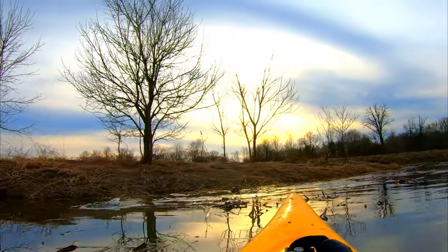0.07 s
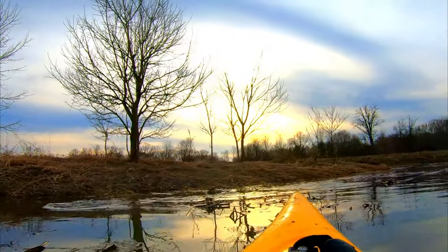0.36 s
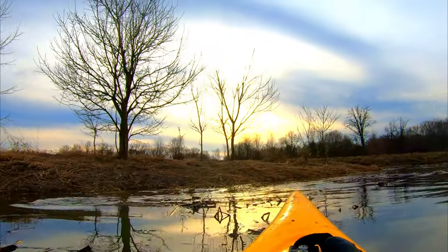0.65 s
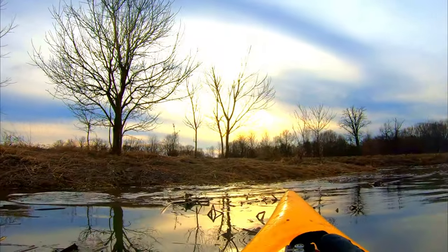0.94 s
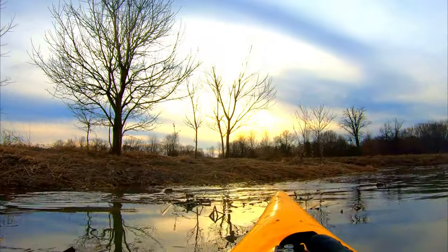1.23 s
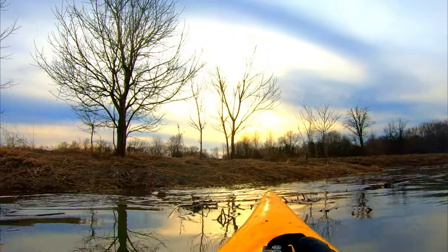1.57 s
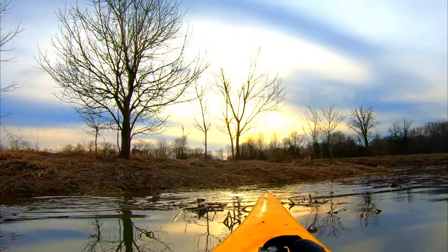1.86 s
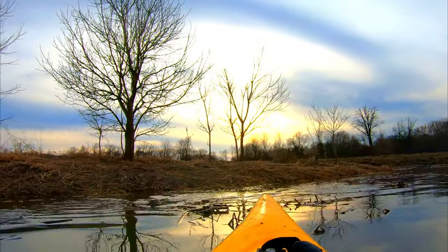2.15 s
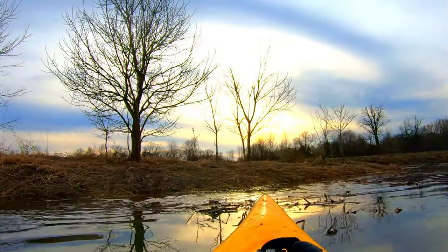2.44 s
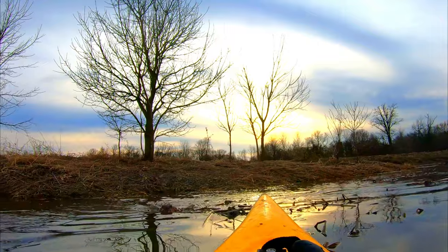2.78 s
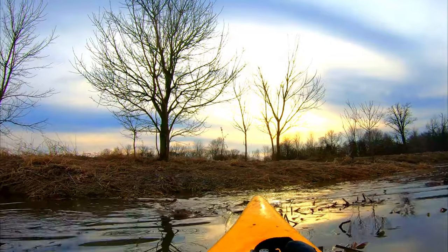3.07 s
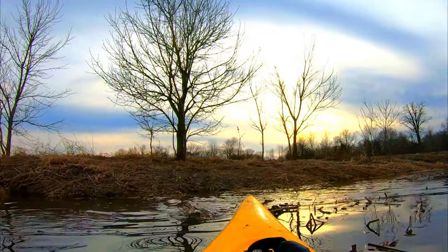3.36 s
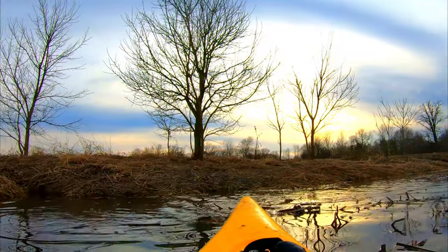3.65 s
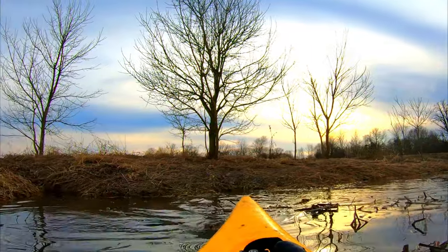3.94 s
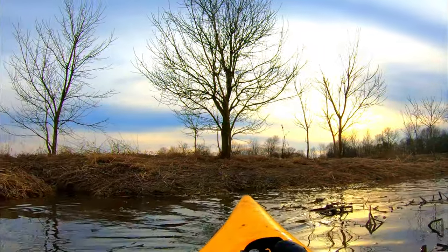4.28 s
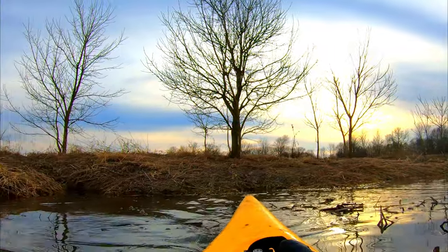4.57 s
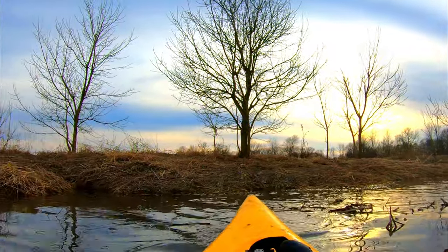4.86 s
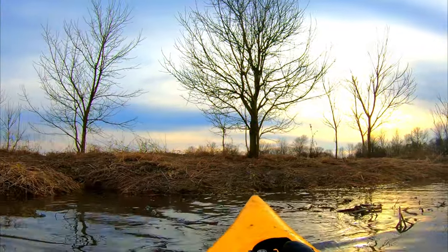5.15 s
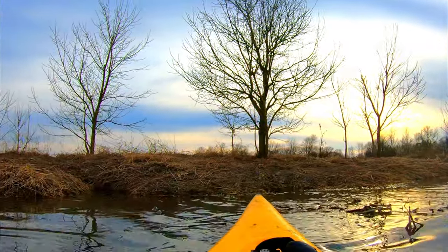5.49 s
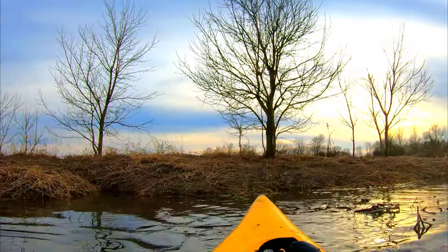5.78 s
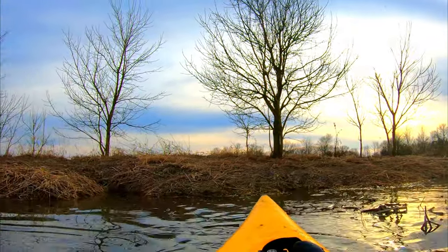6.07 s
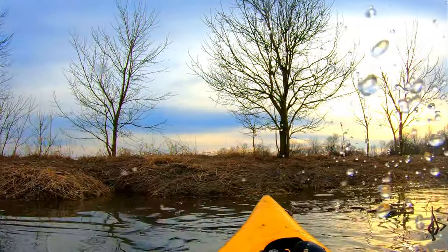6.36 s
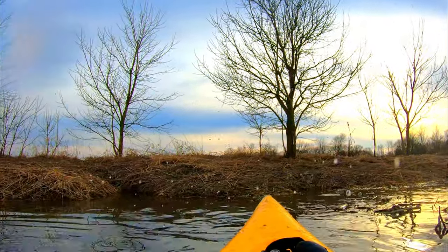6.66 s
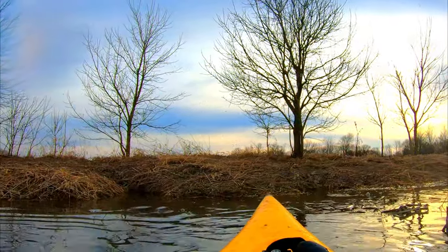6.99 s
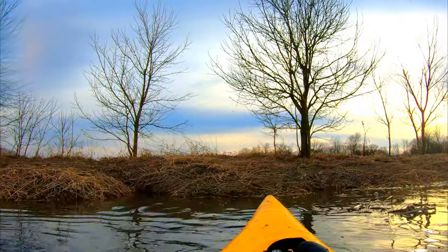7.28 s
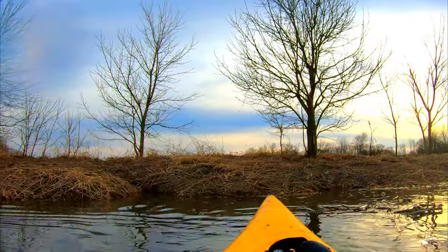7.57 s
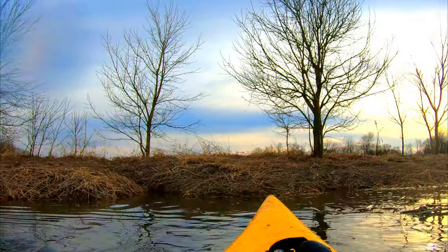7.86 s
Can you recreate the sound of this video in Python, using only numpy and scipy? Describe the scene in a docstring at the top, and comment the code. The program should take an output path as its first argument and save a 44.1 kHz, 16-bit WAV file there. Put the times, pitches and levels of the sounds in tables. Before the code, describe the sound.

On a calm river in open country, a microphone on a kayak picks up small waves lapping and bubbles plopping along the hull. A distant engine hums faintly and fades as the water quietens. A blackbird sings a few notes and a fast trill. Near the end, a loud splash bursts up on the right, drops crack against the microphone, and the spray patters away.

```python
"""On a river, close to the bank, a kayak drifts along. Water trickles and laps at the bow: each little
note is a trapped air bubble ringing. About six seconds in, a splash on the right throws water over the
camera, whose microphone openings crack and ring; drops patter back and the river calms.
Behind the water a blackbird whistles and trills, a small bird twitters, a far engine hums and a breeze
rumbles. A faint, high hiss comes and goes far off, over the soft wash of open country."""
import sys
import numpy as np
from scipy import signal
from scipy.fft import rfft, irfft
from scipy.io import wavfile
from scipy.ndimage import uniform_filter1d

SR = 44100
rng = np.random.default_rng(int(sys.argv[2]) if len(sys.argv) > 2 else 0)


def store_pcm(level_fs):
    """Save levels as 16-bit WAV."""
    pcm = np.round(np.clip(level_fs, -1, 1) * 32767).astype(np.int16)
    wavfile.write(sys.argv[1], SR, np.atleast_2d(pcm).T)


N = 349713
TIME = np.arange(N) / SR
WHOLE = 0, TIME[-1]
GLIDE_END_S, CALM_S = 1.895, 4.95  # the flow drops to a resting trickle; later even that fades
SURGE_S, PATTER_S = 6.31, 6.404  # the wave peaks; the spray starts to land
ATTACK_S = 0.013  # how fast thrown water starts to sound

# small waves breaking on the bow: (time [s], length [s], level [dB])
WAVELETS = [(-0.006, 0.14, -47.5), (1.12, 0.14, -46), (1.268, 0.14, -44.5), (1.415, 0.11, -51),
            (1.479, 0.2, -48.5), (1.696, 0.19, -51.5), (1.889, 0.055, -47.5), (2.255, 0.17, -61.5),
            (2.804, 0.049, -63), (3.652, 0.052, -47.5), (4.27, 0.6, -66.5), (5.173, 0.091, -55.5),
            (6.734, 0.066, -52.5)]
# how loud gurgling bubbles are at each pitch: (pitch [Hz], level [dB])
GURGLE_PITCHES = [(250, -13.5), (500, 0.5), (900, 2.5), (1600, 0.5), (3000, -1), (5000, -5.5),
                  (8000, -39.5)]
# slow bubbles that swoop up as they surface: (pitch [Hz], level [dB])
BLOOP_PITCHES = [(380, -0.5), (600, -5), (1000, 1), (1800, 2), (3200, -6)]
# pinhead bubbles: (pitch [Hz], level [dB])
TINKLE_PITCHES = [(2200, -13), (4000, 0.5), (6000, 9), (9000, 4)]
# the tone of tiny bursting droplets: (frequency [Hz], level [dB])
FIZZ_TONE = [(300, -4), (1500, 13.5), (3500, -5.5), (6000, -0.5), (9000, -1), (10500, -10.5), (12000, -33),
             (16000, -27.5)]
def trickle():
    """Water along the hull bubbles and fizzes, more with each wavelet; landing spray fizzes too."""
    resting = fade(CALM_S, db_per_s=16.5)
    lapping = sum(amp(db) * swell(s, length) for s, length, db in WAVELETS)
    flow = amp(-55.5) * fade(GLIDE_END_S, db_per_s=90) + amp(-62.5) * resting
    fizzing = amp(-56.5) * fade(GLIDE_END_S, db_per_s=15.5) + amp(-73.5) * resting
    fizzing += amp(-67) * onset(PATTER_S) * fade(PATTER_S, db_per_s=28) + amp(-12) * lapping
    gurgle = flow * swarm(GURGLE_PITCHES, WHOLE, per_s=550, spread_db=2.5, side_db=-1.5, cycles=3.5)
    bloops = swarm(BLOOP_PITCHES, WHOLE, per_s=18, spread_db=-1, side_db=-2.5,
                   cycles=9.6, climb=.14, count=40)
    bloops *= amp(-8) * (flow + amp(1.5) * lapping)
    slosh = swarm(GURGLE_PITCHES, WHOLE, per_s=1800, spread_db=1.2, side_db=2, cycles=7, climb=.02)
    tinkle = swarm(TINKLE_PITCHES, WHOLE, per_s=90, spread_db=2.5, side_db=-8, cycles=9)
    fizz = fizzing * crackle(FIZZ_TONE, per_s=530) * sides(-1.5)
    pulsing = amp(-4.5 + 2 * wander(36))
    return pulsing * (gurgle + fizz) + bloops + lapping * slosh + amp(-10) * fizzing * tinkle


# the loudest single bubbles:
# (time [s], level [dB], pitch [Hz], ring [cycles], upward swoop [0-1], left over right [dB])
BIG_BUBBLES = [(0.03, -29.5, 2280, 2.4, 0, 8), (0.058, -32, 1530, 3.9, 0.07, 6),
               (0.058, -35, 947, 7.2, 0.07, -2), (0.293, -41, 990, 16, 0.02, -16),
               (0.343, -33, 3370, 8.2, 0.04, -6), (0.388, -42, 2630, 9.9, 0.14, -8),
               (0.475, -44.5, 1300, 12, 0.12, -16), (0.523, -39.5, 1660, 2.5, 0.03, -6),
               (0.627, -44.5, 597, 7.1, 0.15, -4), (0.704, -38.5, 1510, 8.8, 0.04, -12),
               (0.739, -42, 1377, 9.1, 0.03, 3), (0.783, -51, 3280, 13, 0.03, 0),
               (0.957, -40, 524, 12, 0.12, -7), (1.166, -37, 1870, 7.3, 0.1, 8),
               (1.193, -24, 3340, 3, 0.01, 5), (1.317, -34.5, 1058, 11, 0.06, 13),
               (1.346, -39.5, 553, 8.3, 0.33, -10), (1.45, -25, 1850, 2.3, 0.06, 8),
               (1.478, -26, 1670, 2.4, 0, 7), (1.531, -37.5, 533, 14, 0.14, -18),
               (1.543, -30, 730, 9.6, .04, 11), (1.599, -29, 1674, 4.4, 0.02, 5),
               (1.673, -34, 1720, 3.5, 0.03, 6), (1.71, -31.5, 1910, 2.7, 0.12, 13),
               (1.743, -28.5, 1570, 2.9, .03, 4), (1.752, -34.5, 1700, 10, 0.1, 5),
               (1.812, -38, 415, 3.9, 0.05, -7), (1.855, -41.5, 2670, 13, 0.22, 6),
               (1.904, -33, 1370, 2.3, 0.01, 8), (1.961, -39.5, 548, 5.3, 0.4, -7),
               (2.015, -49.5, 852, 5.6, 0.09, 4), (2.17, -41, 2730, 11, 0.28, 5),
               (2.192, -49.5, 2700, 13, 0.4, 4), (2.27, -45.5, 1673, 6.4, 0.01, 1),
               (2.299, -45.5, 1306, 8.1, 0.02, 7), (2.818, -43, 1520, 9.7, 0.16, 3),
               (2.924, -45.5, 3600, 5, 0, -6), (3.343, -53, 1480, 17, 0.1, 1),
               (3.436, -53, 883, 13, 0.4, 8), (3.667, -38, 817, 15.5, 0.02, -23),
               (3.672, -46.5, 441, 3.2, 0, -12), (3.728, -37, 717, 26, 0.05, -18),
               (3.765, -36.5, 1986, 7.3, 0, -8), (3.788, -46, 1073, 22.5, 0.18, -11),
               (4.563, -42, 3020, 11, .03, 0), (4.829, -43.5, 1450, 8.2, 0.7, -5),
               (4.893, -43.5, 1360, 8.4, .05, 5), (6.002, -31.5, 679, 3.3, 0, -22),
               (6.007, -20, 563, 5.1, 0.02, -18), (6.035, -34, 911, 9.4, 0, -13),
               (6.128, -25.5, 1470, 5, 0.02, -11), (6.1362, -19.5, 3330, 3, 0.02, -12),
               (6.139, -18, 1305, 3, 0.02, -10), (6.143, -14.5, 744, 1.6, 0.03, -16),
               (6.148, -14.5, 624, 1.1, 0.12, -15), (6.155, -11, 560, 1.27, 0, -22),
               (6.181, -22.5, 929, 3.1, 0.06, -14), (6.191, -12, 645, 0.77, 0, -20),
               (6.218, -23, 3240, 3.6, 0.1, -7), (6.2262, -20.5, 1790, 2.4, 0, -8),
               (6.361, -30.5, 843, 3.3, .05, -15), (6.395, -29.5, 910, 1.7, 0, -23),
               (6.611, -37.5, 1450, 2.9, 0.01, -14), (6.652, -43.5, 440, 7.7, 0.18, -3),
               (6.708, -40.5, 1570, 4.7, 0.5, -7), (6.749, -37.5, 984, 5.4, 0.04, -8),
               (6.974, -49.5, 3340, 6.7, 0.1, 1), (7.146, -39, 2100, 2, 0, 0.5),
               (7.42, -50.5, 2970, 11, 0.12, 1)]
# air pockets gulping under the hull: (time [s], level [dB], pitch [Hz])
HULL_GULPS = [(1.643, -36, 195), (1.736, -37, 199), (1.931, -41, 214), (2.668, -41.5, 214),
              (3.673, -40, 225), (3.815, -50.5, 191), (4.688, -45.5, 205), (6.049, -29.5, 165),
              (6.095, -31, 167), (6.187, -26.5, 240)]
def plops():
    """Each big bubble rings and sheds six lesser ones as it breaks up; air pockets gulp lower down."""
    out = np.zeros((2, N))
    for s, db, hz, cycles, rise, side_db in BIG_BUBBLES:
        lag = min(hz / 550, 2.4) * rng.uniform(0.22, 0.62)
        add(out, s, amp(db) * sides(side_db) * bubble(hz, cycles / hz, rise, lag))
        for when, softness, pitch, ring in rng.random((6, 4)):
            shed_hz = hz * 2 ** (1.6 * (pitch - .55))
            shed = bubble(shed_hz, decay_s=.0017 * (.5 + ring), rise=0, lag=lag)
            gain = amp(db - 8 - 10 * (when + softness / 2))
            add(out, s + .022 * when, gain * sides(side_db / 2) * shed)
    for s, db, hz in HULL_GULPS:
        add(out, s, amp(db) * sides(-6.5) * bubble(hz, decay_s=0.019, rise=0))
    return out


# sheets of water thrown up: (time [s], hold [s], churn level [dB], spray level [dB])
SPLASH_SHEETS = [(5.996, 0.042, -41.5, -59.5), (6.121, 0.023, -32, -35), (6.168, 0.03, -34, -33),
                 (6.209, 0.0052, -42, -31.5), (6.263, 0.019, -34.5, -37), (6.352, 0.038, -47.5, -61)]
# bubbles in churning water: (pitch [Hz], level [dB])
CHURN_PITCHES = [(250, 1.5), (550, 8), (900, 0.5), (1600, 0.5), (3000, -3.5), (6000, -7), (9000, -30)]
# the tone of flying spray: (frequency [Hz], level [dB])
SPRAY_TONE = [(200, -1), (1000, 20), (2500, 9), (4500, 8), (7500, 1), (9500, -3), (11500, -17),
              (16000, -35)]
def splash():
    """Water bursts up on the right in quick sheets: bubbles churn and spray tears off in shreds."""
    span = SPLASH_SHEETS[0][0], SPLASH_SHEETS[-1][0] + .15
    churning, spraying = np.zeros((2, N))
    for s, hold, churn_db, spray_db in SPLASH_SHEETS:
        fall_s = s + ATTACK_S + hold
        churning += amp(churn_db) * onset(s) * fade(fall_s, db_per_s=325.5)
        spraying += amp(spray_db) * onset(s) * fade(fall_s, db_per_s=483)
    churn = swarm(CHURN_PITCHES, span, per_s=1100, spread_db=2.5, side_db=-10, cycles=3.5)
    shreds = evened(amp(3.5 * wander(110)))
    droplets = swarm(TINKLE_PITCHES, span, per_s=1500, spread_db=3, side_db=-10, cycles=7)
    spray = amp(-2.5) * crackle(SPRAY_TONE, per_s=810) * sides(-11) + amp(-7) * droplets
    return churning * churn + spraying * shreds * spray


def patter():
    """The spray falls back on the river and makes bubbles that die away."""
    bubbles = swarm(CHURN_PITCHES, WHOLE, per_s=400, spread_db=2, side_db=-8.5, cycles=4.24, climb=.076)
    return amp(-47) * onset(PATTER_S) * fade(PATTER_S, db_per_s=38) * bubbles


# drops hitting by the microphone openings: (time [s], crack [dB], ring [dB], thud [dB])
CAMERA_HITS = [(6.0514, -23, -50, -40), (6.2266, -9, -5, -17), (6.2545, -34, -36, -19),
               (6.2645, -23, -19, -28), (6.2896, -20, -26, -21), (6.3015, 1.5, -24, -5),
               (6.3152, -34, -28, -13), (6.3214, -27, -22, -19), (6.3285, -40, -34, -17)]
# the tone of their crack: (frequency [Hz], level [dB])
CRACK_TONE = [(200, -7), (1000, 3), (3000, -1), (6000, -9), (9000, -3), (12000, -18), (16000, -22)]
def camera_hits():
    """A drop slaps the camera: pressure builds and flips, the wet openings ring and the case thuds."""
    cracks, rings = np.zeros((2, 2, N))
    t = np.arange(-88, 89) / SR
    build_s, flip_s = .00053, .00005
    snap = np.tanh(t / flip_s) * np.exp(-abs(t) / build_s)
    snap_pair = np.array([np.roll(snap, 3), -snap])  # opposite ways in the two openings
    for s, crack_db, ring_db, thud_db in CAMERA_HITS:
        add(cracks, s + t[0], amp(crack_db) * sides(-1.5) * snap_pair)
        spit = rng.standard_normal((2, 60)) * np.exp(-np.arange(60) / 14)
        add(cracks, s, amp(crack_db - 14) * sides(-10) * spit)
        add(rings, s, amp(ring_db) * sides(0.85) * bubble(hz=1223, decay_s=.004, rise=0, lag=2.67))
        add(rings, s, amp(thud_db) * sides(-39) * bubble(hz=115.1, decay_s=.0025, rise=-.02))
    return colour(cracks, CRACK_TONE) + rings


# the tone of a wave pushing on the camera: (frequency [Hz], level [dB])
PUSH_TONE = [(20, -24), (45, -14), (75, -15), (150, -3.5), (300, -2.5), (700, -22), (2000, -52.5)]
# the deep rumble of the wake, also used for the breeze: (frequency [Hz], level [dB])
RUMBLE_TONE = [(15, -26), (28, -10.5), (45, 4), (70, -4.5), (150, -3), (300, -11), (700, -26.5),
               (2000, -67)]
def surge():
    """The wave swells against the camera, collapses and leaves a low wake."""
    rising = amp(81.5 * np.minimum(TIME - SURGE_S, 0))
    push = amp(-32) * fade(SURGE_S, db_per_s=422) * noise(PUSH_TONE)
    wake = amp(-40) * fade(SURGE_S, db_per_s=73) * noise(RUMBLE_TONE)
    return rising * (push + wake) * sides(-6.5)


# drops landing on the water and the deck: (time [s], level [dB], pitch [Hz])
DRIPS = [(0.149, -42, 8900), (0.3428, -27, 9450), (0.457, -38, 9500), (0.663, -33.5, 9200),
         (0.7035, -50, 5030), (1.1688, -36, 4240), (1.5379, -31, 7120), (1.711, -36, 6800),
         (1.7463, -39, 6850), (1.841, -40, 7950), (1.929, -51, 4040), (2.1707, -43, 5390),
         (2.269, -47, 3800), (2.357, -49, 6530), (2.5637, -40, 7180), (3.728, -55, 4060), (4.12, -50, 3650),
         (4.251, -47, 3780), (4.317, -45, 3850), (4.562, -39, 3450), (4.681, -37.5, 3970),
         (6.1836, -18, 7410), (6.1917, -25, 8500), (6.228, -20, 7970), (6.2678, -28.5, 6000),
         (6.2898, -28, 5090), (6.368, -45, 6100), (6.4906, -42.5, 5500), (6.612, -48.5, 3800),
         (7.2418, -48, 6500)]
# the tone that shapes them all: (frequency [Hz], boost [dB])
DRIP_TONE = [(200, 7), (1500, 2.5), (4000, 12), (8500, 2.5), (11500, -6.5), (16000, -25)]
def drips():
    """Each drop snaps as it lands and rings for a few cycles."""
    out, t = np.zeros((2, N)), np.arange(400) / SR
    for s, db, hz in DRIPS:
        add(out, s, amp(db) * bubble(hz, decay_s=.0003, rise=0, lag=0.56))
        add(out, s, amp(db - 14.5) * rng.standard_normal((2, len(t))) * np.exp(-t / 0.0015))
    return colour(out, DRIP_TONE) * sides(-8)


# thin sheets of water on the hull: (time [s], length [s], middle frequency [Hz], level [dB])
HULL_SWISHES = [(0.025, 0.13, 1680, -53), (2.445, 0.11, 2600, -63), (2.942, 0.18, 2440, -65.5),
                (3.647, 0.039, 2980, -61), (5.19, 0.041, 1910, -56), (6.359, 0.053, 3580, -57.5),
                (6.77, 0.031, 2530, -52.5)]
def swishes():
    """Water slides over the hull and makes a soft band of hiss."""
    out = np.zeros((2, N))
    for s, length, hz, db in HULL_SWISHES:
        size = int(length * SR)
        octaves_away = np.log2(np.fft.rfftfreq(size, 1 / SR) / hz + 1e-6)
        band = np.exp(-(octaves_away / .45) ** 2 / 2)
        rush = rng.standard_normal(size) + .6 * rng.standard_normal((2, size))
        hiss = evened(irfft(rfft(rush) * band, size))
        add(out, s, amp(db) * hiss * signal.windows.tukey(size, .6))
    return out * sides(-0.76)


# the blackbird's opening notes: (time [s], length [s], first pitch [Hz], last pitch [Hz], level [dB])
BLACKBIRD_NOTES = [(3.976, 0.07, 1680, 1450, -59), (4.181, 0.1, 1430, 1140, -59.5),
                   (4.313, 0.06, 3500, 3720, -59.5), (4.344, 0.055, 2203, 1876, -48.5),
                   (4.364, 0.055, 1875, 2046, -45.5), (4.354, 0.074, 5920, 5640, -60),
                   (4.441, 0.039, 3350, 3700, -41), (4.457, 0.038, 3780, 3100, -47),
                   (4.449, 0.035, 5190, 5360, -52), (4.479, 0.06, 2716, 2593, -44),
                   (4.495, 0.038, 5110, 5060, -41.5)]
# a small, far bird: (time [s], length [s], chirps [per s], first pitch [Hz], last pitch [Hz], level [dB])
FAR_TWITTERS = [(2.983, .63, 26, 5320, 4760, -71)]
def bird_notes():
    """A blackbird whistles sliding notes and a small bird twitters; the trees blur both."""
    out = np.zeros((2, N))
    for s, length, first_hz, last_hz, db in BLACKBIRD_NOTES:
        note = whistle(length, first_hz, last_hz, waver=.001, buzz=first_hz / 8500)
        add(out, s, amp(db + 2) * sides(-8) * note)
    for s, length, per_s, first_hz, last_hz, db in FAR_TWITTERS:
        for start in np.arange(0, length, 1 / per_s):
            add(out, s + start, amp(db) * whistle(.6 / per_s, first_hz, last_hz, waver=.01, buzz=.4))
    return amp(-2.5) * bank_echo(out, tail_s=.24, echo_db=-1.5)


# the blackbird's trill: (time [s], length [s], pitch [factor], level [dB])
BLACKBIRD_TRILLS = [(4.532, 0.664, 1.011, -42.5)]
# chirps in one beat of it: (middle [beats], length [beats], first pitch [Hz], last pitch [Hz], level [dB])
BEAT_CHIRPS = [(.2, .6, 4050, 2850, -6), (.62, .85, 2500, 2790, 0), (.55, .55, 5200, 4800, -10.5),
               (.92, .36, 5200, 3800, -10.5)]
def blackbird_trill(beats_per_s=66.4):
    """The blackbird repeats a group of chirps very fast, sinking slightly in pitch."""
    out = np.zeros((2, N))
    for s, length, pitch, db in BLACKBIRD_TRILLS:
        for start in np.arange(0, length, 1 / beats_per_s):
            sag = pitch * (1 - .025 * start)
            ending = min((length - start) / .03, 1)
            for middle, width, first_hz, last_hz, chirp_db in BEAT_CHIRPS:
                chirp = whistle(width / beats_per_s, first_hz * sag, last_hz * sag, waver=.013, buzz=.42)
                late, louder_db = rng.standard_normal(2) * (.035, 1.1)
                when = s + start + (middle + late - width / 2) / beats_per_s
                add(out, when, ending * amp(db + chirp_db + louder_db) * sides(-11.5) * chirp)
    return amp(-2) * bank_echo(out, tail_s=.16, echo_db=-.5)


# the hum of a far engine: (time [s], pitch [Hz], level [dB])
ENGINE_HUM = [(0, 129.3, -61), (.12, 130.9, -49.5), (.27, 130, -60.5), (.5, 132.7, -48), (.7, 135.1, -61.5),
              (.83, 136.8, -51), (1.35, 147, -55), (2.1, 159.9, -56), (2.599, 162.2, -66)]
def engine():
    """A far engine slowly gains speed; moving air makes it waver and fade in and out."""
    s, hz, db = np.transpose(ENGINE_HUM)
    pitch = np.interp(TIME, s, hz) * (1 + .012 * wander(12))
    fading = amp(2.5 * wander(12) - 2.5)
    loudness = amp(np.interp(TIME, s, db, left=-200, right=-200))
    return fading * loudness * np.sin(2 * np.pi * np.cumsum(pitch) / SR) * sides(-5)


# the tone of wet microphone openings: (frequency [Hz], level [dB])
WET_TONE = [(250, -9), (520, 23), (900, -13), (3600, 3), (5000, 0), (5700, -12), (7000, -2.5), (9600, -20),
            (10600, -9.5), (12500, -30.5)]
def wet_hiss():
    """Once the microphone openings are wet, their hiss rings faintly."""
    return amp(-67) * onset(SURGE_S) * noise(WET_TONE) * sides(-0.79)


# swells of two background sounds: (time [s], length [s], breeze level [dB], far hiss level [dB])
BACKGROUND_SWELLS = [(0, 0.34, -59, -59.5), (0.316, 0.86, -62.5, -77), (2.763, 0.74, -88, -70.5),
                     (3.24, 0.34, -60.5, -94), (7.01, 0.45, -87, -70.5), (7.337, 0.64, -70.5, -81.5)]
# the tone of the far hiss: (frequency [Hz], level [dB])
FAR_HISS_TONE = [(300, -31), (1000, 2), (2200, -3), (3200, 1), (5000, -4.5), (5600, -24), (7000, -12.5),
                 (8500, -21), (11000, -29), (13000, -45.5), (16000, -31.5)]
def breeze_and_far_hiss():
    """A breeze rumbles on the microphones. Apart from it, a faint, far, high hiss comes and goes."""
    rumble = sum(amp(db) * swell(s, length) for s, length, db, _ in BACKGROUND_SWELLS)
    hiss = amp(-77) + sum(amp(db) * swell(s, length) for s, length, _, db in BACKGROUND_SWELLS)
    return rumble * noise(RUMBLE_TONE) * sides(-1.3) + hiss * noise(FAR_HISS_TONE) * sides(-0.79)


# the tone of the open air: (frequency [Hz], level [dB])
AIR_TONE = [(15, -50), (25, -9), (93, -11.5), (118, -18.5), (135, -1.5), (213, 1.5), (309, -6), (604, -14),
            (769, -11), (1240, -16.5), (1460, -12.5), (2020, -34), (6540, -52.5), (8550, -43), (15000, -75)]
# how alike it is on the left and right: (frequency [Hz], likeness [0-1])
AIR_LIKENESS = [(60, 0.79), (180, 0.92), (550, 0.73), (1650, 0.098), (4970, 0.26), (15000, 0.29)]
# which way it leans: (frequency [Hz], left over right [dB])
AIR_BALANCE = [(60, -4.5), (180, -2.5), (550, -7), (1650, 2.5), (4970, -9), (15000, -5)]
# the camera's gain on this wash, dipping at set times after loud water: (time [s], gain [dB])
CAMERA_GAIN = [(0, -1), (2.1, -2.5), (3.4, 0), (3.9, -3), (5.4, 1), (6.3, 1.5), (6.85, -6.5), (7.4, 1.5),
               (7.93, 0.5)]
def open_air():
    """The low wash of open country; it ducks as the camera's gain dips, then recovers."""
    hz = np.fft.rfftfreq(N, 1 / SR)
    shared, separate = rfft(noise(AIR_TONE))
    same, lean = read(AIR_LIKENESS, hz), amp(read(AIR_BALANCE, hz) / 2)
    right = same * shared + np.sqrt(1 - same ** 2) * separate
    wash = evened(irfft(np.array([shared * lean, right / lean]), N))
    gain_db = np.interp(TIME, *np.transpose(CAMERA_GAIN))
    return amp(-57 + gain_db) * wash * amp(1.6 * wander(9) - 1.5)


def bubble(hz, decay_s, rise, lag=0):
    """Trapped air rings, swooping up as it nears the surface; the right side is lag radians late."""
    age = np.arange(int(7 * decay_s * SR) + 8) / SR / decay_s
    pinch_off = min(.4, .6 / (hz * decay_s))
    swing = (1 - np.exp(-age / pinch_off)) * np.exp(-age)
    pitch = hz * (1 + rise * np.minimum(age, 3.5) ** 2 / 2)
    phase = 2 * np.pi * np.cumsum(pitch) / SR
    return swing / swing.max() * np.sin(phase + np.array([[lag], [0]]))


def swarm(pitches, span, per_s, spread_db, side_db, cycles, climb=0.021, count=90):
    """Many small bubbles of random size and place, ringing between the two times in span."""
    out, length = np.zeros((2, N)), span[1] - span[0]
    for hz in np.geomspace(pitches[0][0], pitches[-1][0], count):
        ring, rise, place, lag = rng.random(4)
        decay_s = min(cycles * (.3 + 1.4 * ring ** 2) / hz, .012)
        shape = bubble(hz, decay_s, climb + .14 * (rise - .5), 2.5 * lag)
        shape *= sides(side_db + 20 * (place - .5)) * amp(read(pitches, hz)) / np.sqrt(decay_s)
        scatter = np.random.default_rng(rng.integers(2 ** 31))
        for when, size in scatter.random((int(per_s * length / count), 2)):
            add(out, span[0] + when * length, shape * amp(spread_db * min(-np.log(1 - size), 3)))
    return evened(out) * np.sqrt(length * SR / N)


def crackle(tone, per_s):
    """Tiny droplets burst over a somewhat stronger fine hiss."""
    sizes = amp(3.2 * np.minimum(rng.exponential(1, N), 3.5)) * (rng.random(N) < per_s / SR)
    burst = rng.standard_normal((2, 64)) * np.exp(-np.arange(64) / 10)
    pops = signal.oaconvolve(sizes * rng.standard_normal((2, N)), burst, axes=1)[:, :N]
    return evened(.6 * evened(colour(pops, tone)) + noise(tone))


def whistle(length, first_hz, last_hz, waver, buzz):
    """One sliding note from a bird's voice box, with a quick uneven quiver in its pitch."""
    size = int(length * SR)
    hz = np.linspace(first_hz, last_hz, size) * (1 + waver * rng.standard_normal())
    quiver = evened(uniform_filter1d(uniform_filter1d(rng.standard_normal(size), 70), 40))
    return np.sin(2 * np.pi * np.cumsum(hz) / SR + buzz * quiver) * signal.windows.tukey(size, .7)


def bank_echo(x, tail_s, echo_db):
    """Adds sound scattered by the water, bank and trees; it falls 60 dB in tail_s."""
    t = np.arange(SR // 2) / SR
    tail = rng.standard_normal((2, len(t))) * amp(-60 * t / tail_s) * (t > .002)
    return x + amp(echo_db) * signal.oaconvolve(x, tail / np.linalg.norm(tail[0]), axes=1)[:, :N]


def amp(db):
    """Turns decibels into a gain, the number a sound is multiplied by."""
    return 10 ** (np.asarray(db) / 20)


def evened(x):
    """Scales a sound to an average strength (rms) of 1."""
    return x / np.sqrt(np.mean(x ** 2) + 1e-20)


def read(points, hz):
    """Looks up a frequency in a table, sliding between rows on a musical scale."""
    f, value = np.transpose(points)
    return np.interp(np.log(hz + 1), np.log(f + 1), value)


def sides(side_db):
    """Left and right gains: above 0 leans left, below 0 leans right."""
    return evened(amp([[side_db / 2], [-side_db / 2]]))


def colour(x, tone):
    """Turns each frequency up or down by a tone table."""
    return irfft(rfft(x) * amp(read(tone, np.fft.rfftfreq(N, 1 / SR))), N)


def noise(tone):
    """Separate left and right noise with this tone."""
    return evened(colour(rng.standard_normal((2, N)), tone))


def add(mix, s, sound):
    """Mixes a sound in at time s."""
    part = mix[:, max(round(s * SR), 0):][:, :sound.shape[-1]]
    part += sound[..., :part.shape[1]]


def wander(hz):
    """A smooth random curve that wiggles up to about hz times a second."""
    smoothing = np.exp(-(np.fft.rfftfreq(N, 1 / SR) / hz) ** 2)
    return evened(irfft(rfft(rng.standard_normal(N)) * smoothing, N))


def swell(s, length):
    """A gain that rises to 1, holds and falls again."""
    out = np.zeros((1, N))
    add(out, s, signal.windows.tukey(int(length * SR), .6))
    return out[0]


def fade(s, db_per_s):
    """A gain that stays at 1 until time s, then dies away."""
    return amp(-db_per_s * np.maximum(TIME - s, 0))


def onset(s):
    """A gain that opens quickly from 0 to 1 at time s."""
    return np.clip((TIME - s) / ATTACK_S, 0, 1)


def scene():
    """The water with its short echo, then the drops on the camera and the background."""
    water = trickle() + plops() + splash() + patter() + surge() + drips() + swishes()
    near = bank_echo(water, tail_s=.033, echo_db=-9.5) + camera_hits()
    birds = bird_notes() + blackbird_trill()
    return near + birds + engine() + wet_hiss() + breeze_and_far_hiss() + open_air()


def record(dry):
    """The loudest crack overloads the camera, which also cuts the deepest bass and highest treble."""
    overloaded = np.clip(dry, -.86, .86)
    bass_cut = signal.butter(2, 30, "highpass", fs=SR, output="sos")
    treble_cut = signal.firwin(511, 15800, window=("kaiser", 9), fs=SR)
    return signal.oaconvolve(signal.sosfilt(bass_cut, overloaded), treble_cut[None], "same")


dry = scene()
out = record(dry)
store_pcm(out)
```